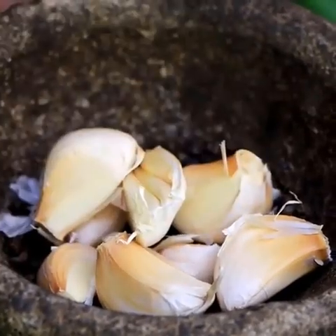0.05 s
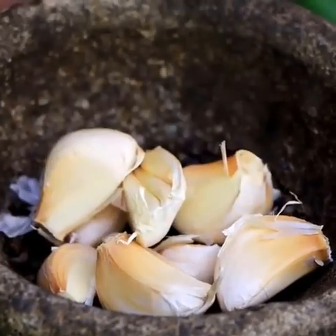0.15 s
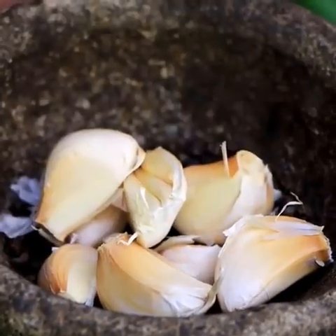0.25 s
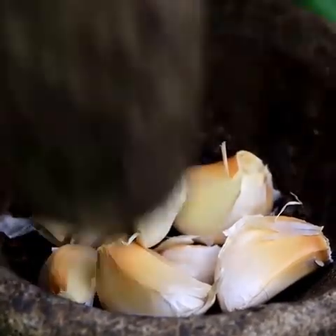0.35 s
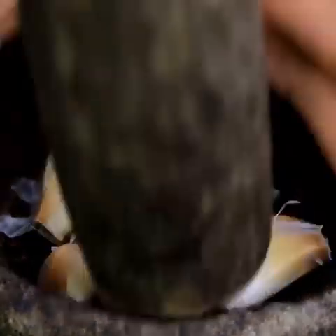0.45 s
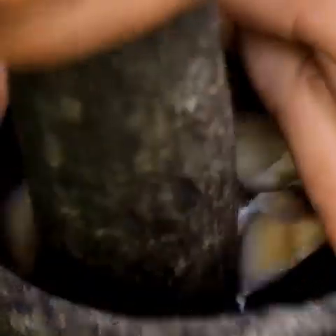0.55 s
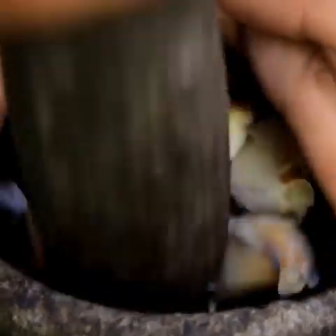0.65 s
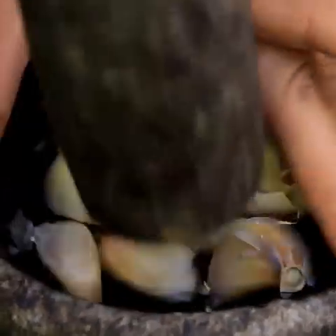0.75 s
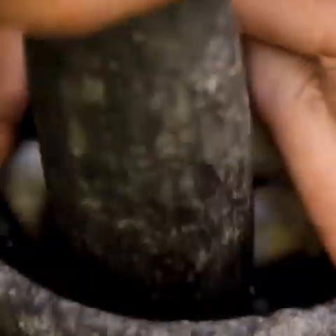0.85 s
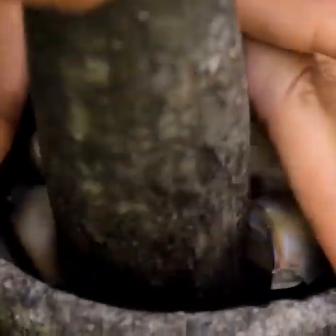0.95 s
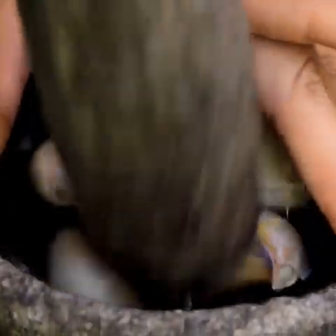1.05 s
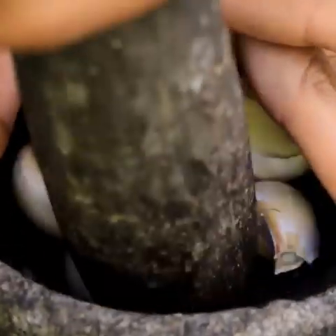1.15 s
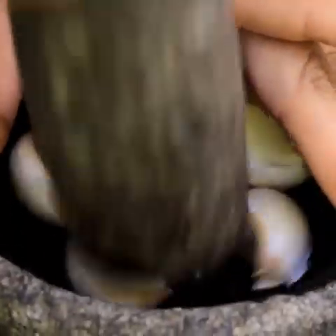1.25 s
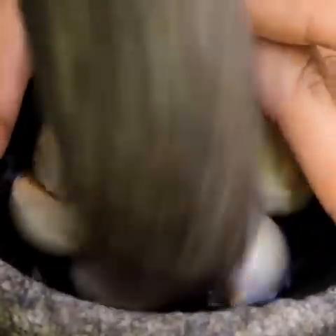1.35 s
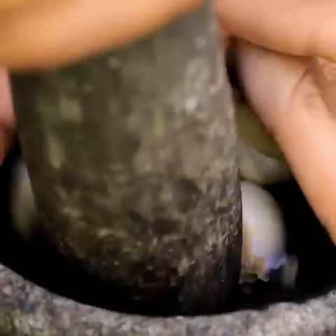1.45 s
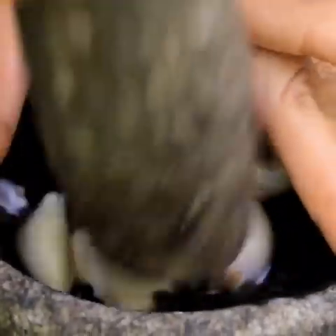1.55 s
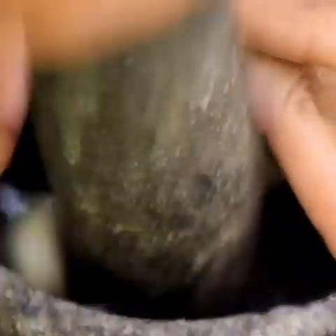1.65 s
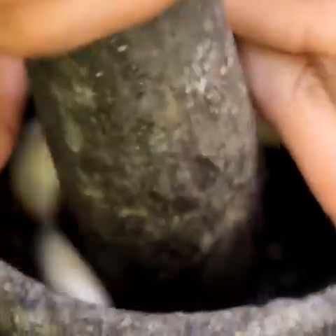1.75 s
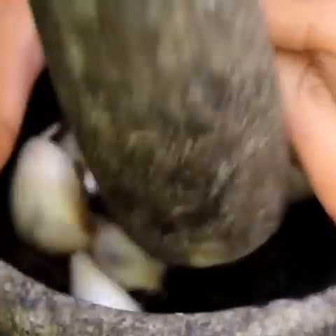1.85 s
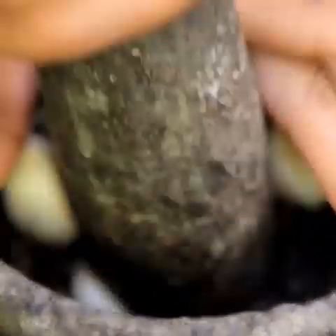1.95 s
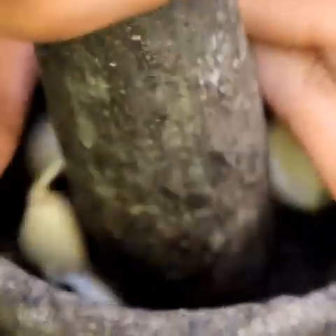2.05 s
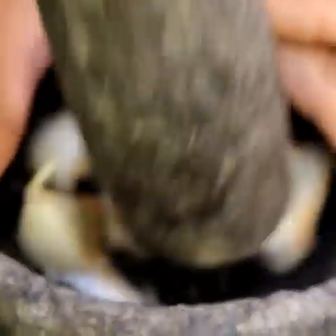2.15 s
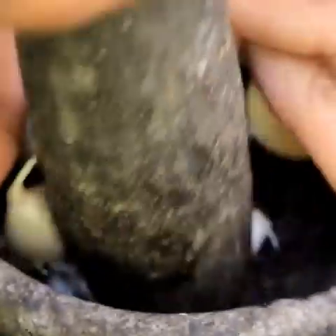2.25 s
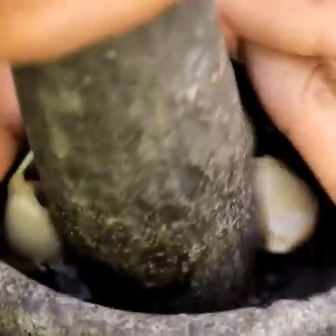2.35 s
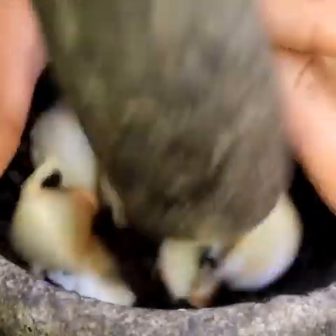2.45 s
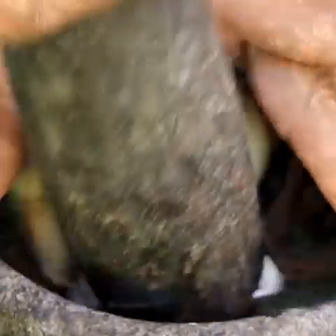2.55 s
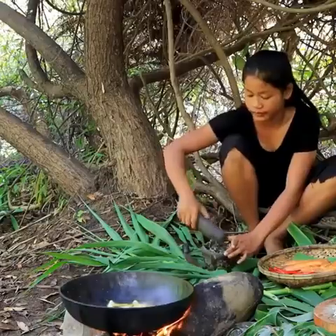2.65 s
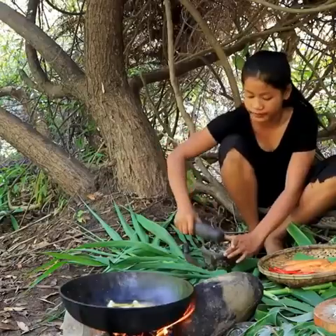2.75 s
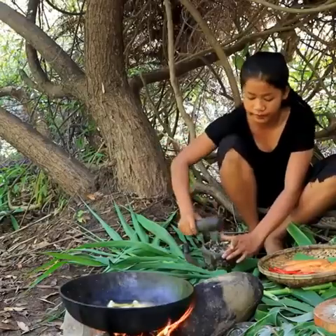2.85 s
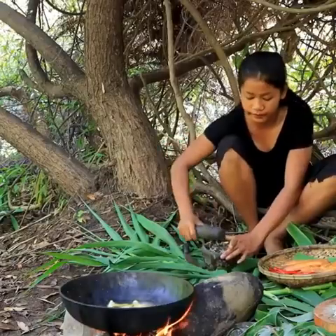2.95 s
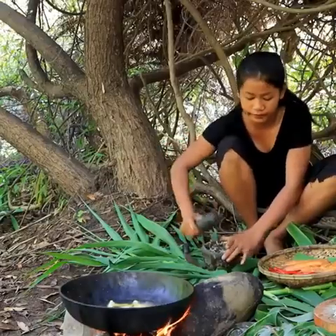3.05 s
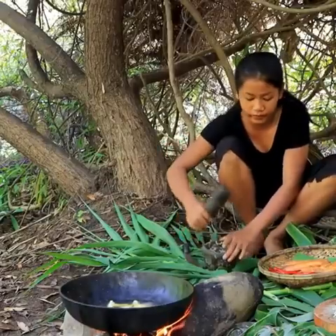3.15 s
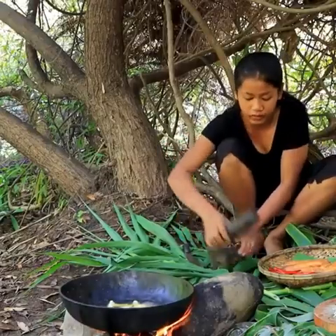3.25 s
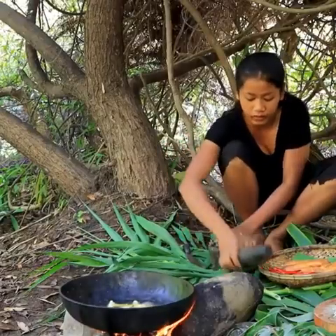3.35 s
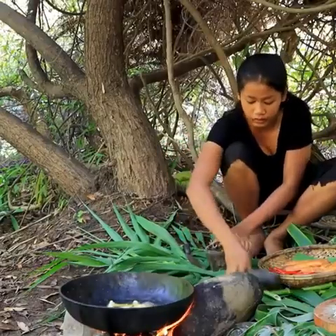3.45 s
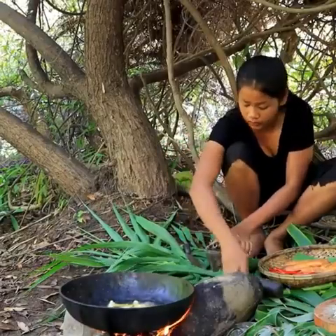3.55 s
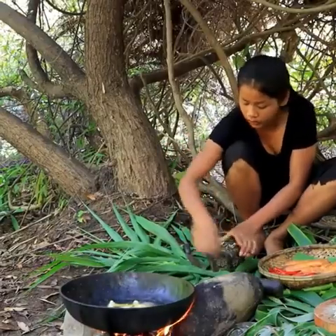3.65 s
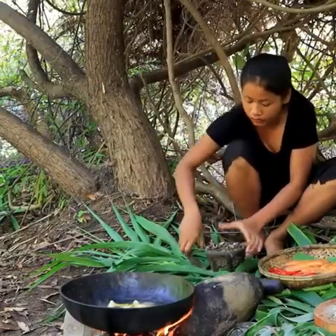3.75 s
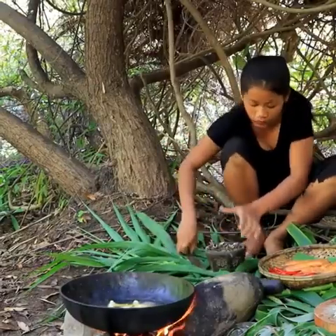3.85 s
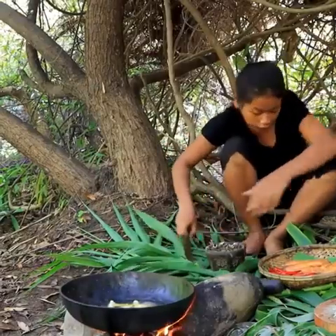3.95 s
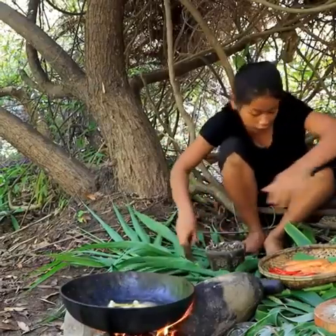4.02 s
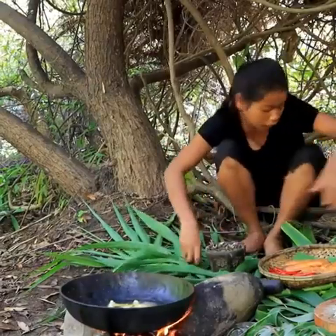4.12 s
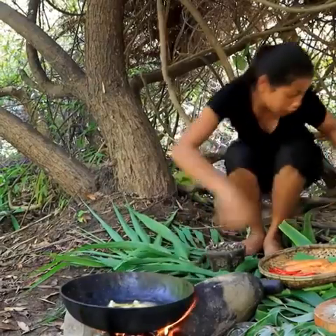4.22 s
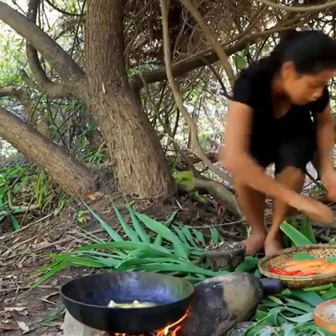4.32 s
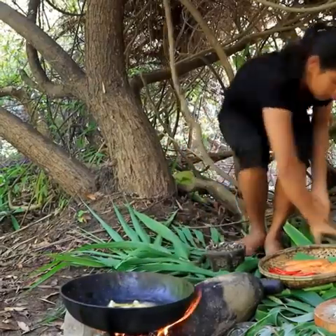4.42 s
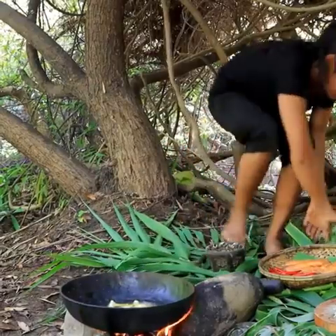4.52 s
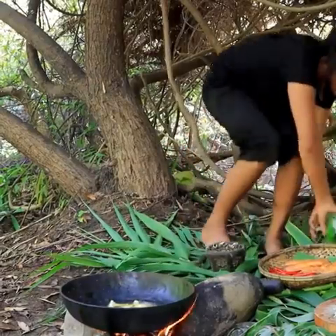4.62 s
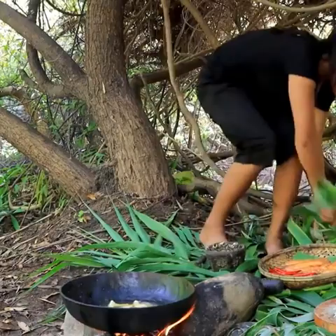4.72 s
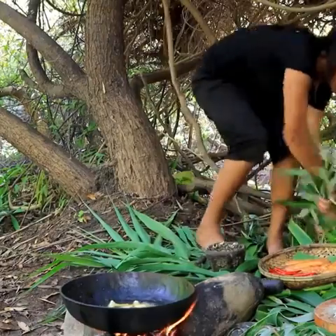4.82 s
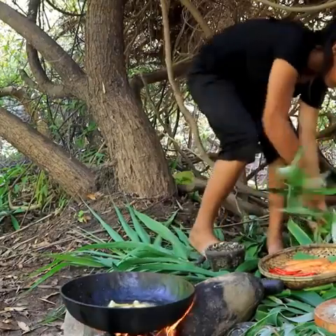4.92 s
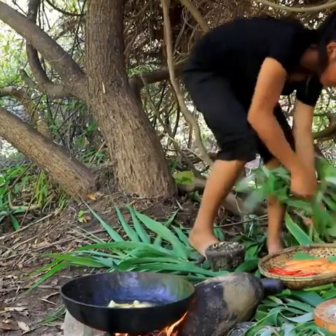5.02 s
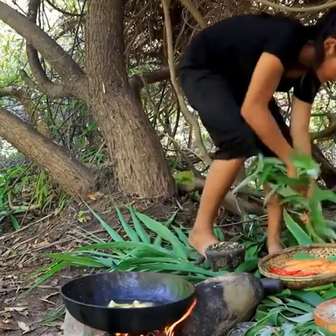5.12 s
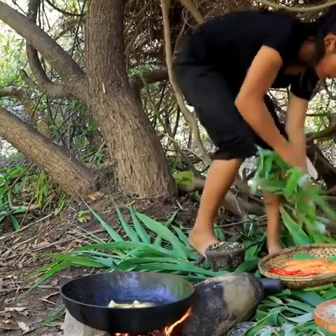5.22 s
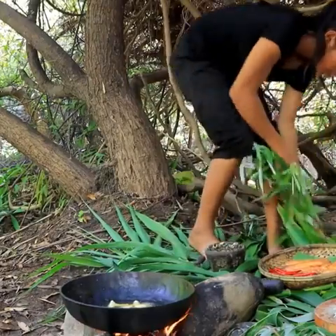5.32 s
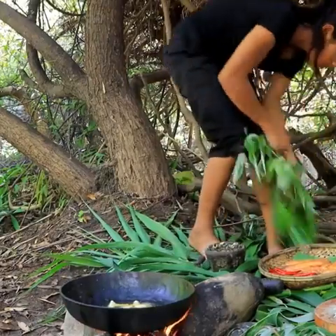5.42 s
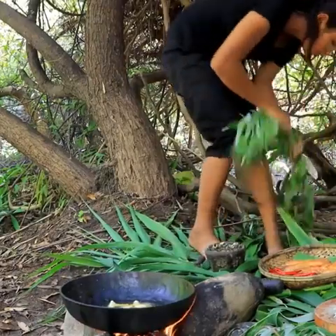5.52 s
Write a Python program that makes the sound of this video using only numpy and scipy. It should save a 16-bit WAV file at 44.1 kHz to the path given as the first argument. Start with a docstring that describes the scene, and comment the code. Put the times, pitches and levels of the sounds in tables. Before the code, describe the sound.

Outdoors, close and nearly dry, with a very short dull echo. The first half second is almost silent: faint, dull distant water, a tiny husk rustle at 0.15 s and a soft nudge at 0.2. At 0.53-0.7 s light hollow stone taps cluster with a small crunch; at 0.87 a hard bright knock bounces quickly and grinds to rest. Cushioned, gritty crunches follow at about 1.15, 1.45, 1.7, 2.0, 2.3 and 2.6 s, crumbs pattering between them over soft thuds and low rumble. At 2.6 s the water abruptly turns near, bright and louder, a steady fizzing, frying-like hiss with fine bubbles. Two strong ringing stone knocks land at 2.8 and 3.0 s. Afterwards the hiss continues to 5.6 s under random ticks, sharp snaps at 3.55, 4.07 and 5.1, rising gurgles mostly 3.4-4.0, and brief leaf rustles at 3.55 and from 4.6 onward.

```python
"""Stone pestle and mortar beside water

A stone pestle pounds garlic and peppercorns, close up and outdoors; at the end leaves are lifted.
Bare stone knocks from decaying modes and rings the pestle; spices crunch as click trains through the mortar.
Water is noise, spray, splashes and rising bubbles: at first dull, then abruptly bright and louder.
Thuds, snaps, filtered rustles, gurgles, a low rumble of handling and a short echo complete the place."""
import sys
import numpy as np
from scipy import signal
from scipy.fft import rfft, irfft
from scipy.io import wavfile

SR = 44100
rng = np.random.default_rng(int(sys.argv[2]) if len(sys.argv) > 2 else 0)


def output_pcm(signal):
    """Save a mono or channel-first signal as 16-bit PCM at the path in sys.argv[1].

    Samples are clipped to [-1, 1] before scaling.
    """
    pcm = np.clip(np.atleast_2d(signal).T, -1, 1) * 32767
    wavfile.write(sys.argv[1], SR, np.round(pcm).astype(np.int16))


N = 246078

# stone meets stone: t/s, knock level/dB, pitch of the hollow f/Hz, contact chatter f/Hz,
# chatter level/dB, pestle ring level/dB, time to the first rebound/s (0 = none)
BARE_BLOWS = [(0.532, -21, 1222, 1820, -29, -32, 0.0021), (0.5551, -33, 1390, 2980, -36.5, -30, 0.0004),
              (0.5673, -39.5, 1400, 2970, -35.5, -26.5, 0), (.6065, -26, 1384, 2440, -44, -42, 0.0045),
              (.691, -24, 1339, 2650, -48.5, -39.5, 0.00024), (0.8673, -8, 1348, 2750, -7.5, -16.5, 0.007),
              (2.568, -16, 1469, 2890, -21, -42, 0), (2.8235, -9, 1495, 3385, -22.5, -8.5, .0074),
              (2.9717, -7, 1479, 3435, -11.5, -10.5, 0.0058)]
# spices burst under the pestle: t/s, level/dB, rise/s, fall/s, hollow boost/dB, treble boost/dB,
# scattering crumbs level/dB, thud level/dB
SPICE_BLOWS = [(0.616, -29, 0.0285, 0.0115, -4.5, 25.5, -46, -65.5),
               (.873, -27, 0.0028, 0.0171, -3, 32, -42.5, -55.5),
               (1.1551, -20.5, 0.00716, 0.00884, -0.5, 7.5, -46, -42),
               (1.440, -17.5, 0.00634, 0.00447, 1.5, 15.5, -43.5, -36),
               (1.716, -19, 0.00764, 0.011, 5.5, 25, -40, -36),
               (2.002, -19.5, 0.00687, 0.00873, 5, 23, -43, -38),
               (2.29, -23.5, 0.0111, 0.0073, 1.5, 14.5, -42, -41.5),
               (2.576, -19, 0.0066, 0.00533, -0.5, 0.5, -54.5, -40.5)]
WATER_NEARS_S = 2.61
GURGLE_RISE_OCTAVES_PER_S = 6.16


def amp(db):
    """Decibels to gain."""
    return 10 ** (np.asarray(db) / 20)


def evened(x):
    """Scales to rms 1."""
    return x / np.sqrt(np.mean(x ** 2) + 1e-20)


def peaked(x):
    """Scales to peak 1."""
    return x / (abs(x).max() + 1e-12)


def seconds(length):
    """A time axis in seconds."""
    return np.arange(int(length * SR)) / SR


def curve(rows):
    """Joins rows (s, value) by straight lines over the whole scene."""
    return np.interp(np.arange(N) / SR, *np.transpose(rows))


def add(mix, s, sound):
    """Lays a sound into the mix at time s."""
    part = mix[max(round(s * SR), 0):][:len(sound)]
    part += sound[:len(part)]


def coloured(x, points):
    """Filters x by a curve of points (Hz, dB), then scales to rms 1."""
    f, db = np.transpose(points)
    log_f = np.log(np.fft.rfftfreq(len(x), 1 / SR) + 1)
    gain = amp(np.interp(log_f, np.log(f + 1), db))
    return evened(irfft(rfft(x) * gain, len(x)))


def drift(size, hz):
    """A random wander through hz new values a second, joined by straight lines."""
    knots = np.arange(size) * hz / SR
    return np.interp(knots, np.arange(size), rng.standard_normal(size))


def grains(size, per_s, spread_db):
    """A random train of small and large clicks of either sign, at rms 1."""
    sizes = amp(spread_db * np.minimum(rng.exponential(1, size), 4)) * rng.choice([-1, 1], size)
    return evened(sizes * (rng.random(size) < per_s / SR))


def swell(t, peak_s):
    """Rises to 1 at t = peak_s and dies away."""
    return t / peak_s * np.exp(1 - t / peak_s)


def chance_times(start, per_s):
    """Random moments from start to the end, each with two values between -1 and 1."""
    draws = rng.random((64, 3))
    times = start + np.cumsum(.3 + 1.4 * draws[:, 0]) / per_s
    return np.column_stack([times, 2 * draws[:, 1:] - 1])[times < N / SR]


def bubble(hz, octaves_per_s, length):
    """A bubble rings and rises in pitch as it nears the surface; it is loudest near half its length."""
    t = seconds(.12)
    turns = np.cumsum(hz * 2 ** (octaves_per_s * t)) / SR
    return swell(t, length / 2) * np.sin(2 * np.pi * turns)


def babble(count=48, per_s=14, cycles=6):
    """Crowds of bubbles of many sizes; the smaller and higher they are, the more of them."""
    out = np.zeros(N)
    for hz in np.geomspace(430, 3200, count):
        shape = bubble(hz, rng.uniform(1, 11.73), cycles / hz * rng.uniform(0.563, 1.0))
        shape = shape / np.linalg.norm(shape)
        births = grains(N, per_s * hz / 1000, spread_db=2.0)
        out += signal.oaconvolve(births, shape)[:N] * np.sqrt(hz)
    return evened(out)


def splashes(count=7, decay_s=0.0162):
    """Small splashes: short puffs of hiss, each in a band of its own."""
    out, puff = np.zeros(N), swell(seconds(.1), decay_s / 2)
    for hz in np.geomspace(550, 2000, count):
        size = abs(signal.oaconvolve(abs(grains(N, per_s=16, spread_db=1.8)), puff)[:N])
        band = signal.butter(2, [hz / 1.2, hz * 1.2], "band", fs=SR)
        out += size * signal.lfilter(*band, rng.standard_normal(N))
    return evened(out)


def water(bubbles_db=-6, spray_db=-5, splashes_db=-9, far_db=-45, near_db=-0.3274):
    """Wash, spray, splashes and bubbles, first distant and dull, then near and bright."""
    # tone of the distant and of the near water: f/Hz, relative level/dB
    far_tone = [(190, -39.5), (330, -21), (685, -8), (860, -7), (1420, -7), (1620, -5), (1760, -9),
                (2390, -15.5), (2640, -13.5), (3480, -11.5), (4360, -10), (5480, -4.5), (7220, -8),
                (12700, -24), (16000, -25.5)]
    near_tone = [(120, -68.5), (200, -44.5), (263, -12.5), (305, -17), (440, -3.5), (538, -1), (916, 0),
                 (1420, 1.5), (3430, -5), (4680, 2), (6050, 1.5), (7270, 4.5), (10900, -14), (14300, -15.5),
                 (16000, -22.5)]
    # course of the near water: t/s, level relative to near_db/dB
    near_flow = [(2.66, -41), (3.46, -39), (4.43, -39), (5.58, -39)]
    spray = grains(N, per_s=4000, spread_db=3.2) * amp(2.5 * drift(N, hz=160))
    wash = rng.standard_normal(N) * amp(1.4 * drift(N, hz=60))
    wash = coloured(wash, [(100, 3.5), (400, 3.5), (600, 0.0), (2200, -1), (3500, 4.0), (7000, -9), (10000, 0)])
    stir = wash + amp(spray_db) * spray + amp(bubbles_db) * babble() + amp(splashes_db) * splashes()
    near = np.clip((np.arange(N) / SR - WATER_NEARS_S) / 0.016 + .5, 0, 1)  # a 16 ms crossfade
    far_water = amp(far_db) * coloured(stir, far_tone)
    near_water = amp(near_db + curve(near_flow)) * coloured(stir, near_tone)
    return (1 - near) * far_water + near * near_water


def low_rumble(murmur_db=-67):
    """Low rumble of handling, strongest during the pounding, over a steady low murmur."""
    # tone of the rumble and of the murmur: f/Hz, relative level/dB
    rumble_tone = [(20, -2), (40, 9.5), (60, -0.5), (85, -12), (130, -16), (250, -12.5), (500, -33.5),
                   (2000, -70)]
    murmur_tone = [(20, -14.5), (50, -6.5), (78, -2.5), (110, -8.5), (250, -5.5), (500, -8), (2000, -54.5)]
    # course of the rumble: t/s, level/dB
    rumble_course = [(0, -85.5), (1.05, -63.5), (1.9, -64), (2.4, -69), (3.0, -87.5), (5.58, -102)]
    rumble = amp(curve(rumble_course)) * coloured(rng.standard_normal(N), rumble_tone)
    return rumble + amp(murmur_db) * coloured(rng.standard_normal(N), murmur_tone)


def leaves(band_octaves=0.65):
    """Leaves and husks brush each other in clumps of tiny slips that swell and fade."""
    # husks and leaves brushed or lifted: t/s at the height, level/dB, spread of the swell/s, centre f/Hz
    rustles = [(0.151, -43.5, 0.009, 1290), (3.551, -34.5, 0.0074, 5000), (4.599, -46, 0.03, 1700),
               (4.939, -40, 0.0122, 2000), (5.001, -45, 0.028, 2300), (5.231, -36.5, 0.013, 2000),
               (5.35, -45, 0.024, 2000), (5.556, -49, 0.047, 3000)]
    out, t = np.zeros(N), np.arange(N) / SR
    slips = grains(N, per_s=2500, spread_db=3) * amp(3 * drift(N, hz=70))
    for s, db, spread_s, hz in rustles:
        edges = [hz / 2 ** band_octaves, min(hz * 2 ** band_octaves, SR * .45)]
        band = signal.butter(1, edges, "band", fs=SR)
        envelope = np.exp(-.5 * ((t - s) / spread_s) ** 2)
        out += amp(db) * envelope * evened(signal.lfilter(*band, slips))
    return out


def mortar(hollow_hz, hollow_db=0, treble_db=0):
    """The mortar's answer to one click; the pestle shades the opening and shifts the hollow's pitch."""
    # modes, hollow first (each blow sets its pitch): f/Hz, width/Hz, level before weighting by width/dB
    modes = [(1400, 139.7, 9.5), (2818, 57, 0), (3514, 240, 5.5), (5016, 790, 7), (6741, 865, 7.5),
             (7286, 182, 4.5), (8803, 413, 2), (12740, 1600, -26.5)]
    t = seconds(.08)
    hz, width, db = np.array(modes, float).T
    hz[0] = hollow_hz
    db[0] += hollow_db
    db[-1] += treble_db
    ringing = np.exp(-np.pi * np.outer(width, t)) * np.cos(2 * np.pi * np.outer(hz, t))
    return (amp(db) * width) @ ringing


def knock(hollow_hz, hollow_db=10, contact_hz=3500):
    """The hollow knock of the mortar, dulled by the length of the contact, at peak 1."""
    contact = signal.butter(2, min(contact_hz, SR / 3), fs=SR)
    return peaked(signal.lfilter(*contact, mortar(hollow_hz, hollow_db)))


def thud(hz, decay):
    """A few low cycles that sink from 1.37 to 0.64 of hz as the mortar settles, at peak 1."""
    t = seconds(.25)
    turns = np.cumsum(hz * (0.637 + 0.73 * np.exp(-t / decay))) / SR
    return peaked(np.exp(-t / decay) * (1 - np.exp(-t / 0.00055)) * np.sin(2 * np.pi * turns))


def thuds(through_db=-10, through_hz=1420, thud_growth=3.2, soft_hz=105.7, soft_s=0.00645, soft_lag_s=0.00167):
    """The ground takes every blow and nudge; a cushioned blow pushes later and knocks faintly through."""
    # jolt and sinking of the mortar under a full-strength bare blow: nominal f/Hz, decay/s, level/dB
    hard_thud = [(329, 0.00172, -16), (129.8, 0.0101, -21.5)]
    # further low thuds, one under the blow at 0.53 s, the others nudges of the mortar:
    # t/s, level/dB, nominal f/Hz, decay/s
    further_thuds = [(.219, -37, 226, 0.00225), (.5325, -35.5, 391, 0.0035), (1.024, -47.5, 64.6, 0.0133),
                     (1.068, -46, 57.3, 0.0296)]
    out = np.zeros(N)
    for s, db, *_ in BARE_BLOWS:
        for hz, decay, thud_db in hard_thud:
            add(out, s, amp(thud_db + thud_growth * db) * thud(hz, decay))
    for s, db, *_, thud_db in SPICE_BLOWS:
        add(out, s, amp(db + through_db) * knock(through_hz))
        add(out, s + soft_lag_s, amp(thud_db) * thud(soft_hz, soft_s))
    for s, db, hz, decay in further_thuds:
        add(out, s, amp(db) * thud(hz, decay))
    return out


def pestle_ring(t, rise_s=0.00201):
    """The pestle's high modes ring on after a soft onset, at peak 1."""
    # modes: f/Hz, relative level/dB, time to fall 60 dB/s
    modes = [(6858.5, 10, 0.0287), (7033, -14.5, 0.049), (15400, -28, .014)]
    ring = sum(amp(db - 60 * t / t60) * np.sin(2 * np.pi * hz * t) for hz, db, t60 in modes)
    return peaked(ring * (1 - np.exp(-(t / rise_s) ** 2)))


def rebounds(t, db, hollow_hz, chatter, flight, count=3, share=0.69, fade_db_per_s=709):
    """The pestle bounces: each flight is a share of the last, knocks fade and the hollow sounds sharper."""
    out = np.zeros(len(t))
    rebound = knock(hollow_hz * 1.0926, contact_hz=2300) + amp(-19.5) * chatter
    for late in np.cumsum(flight * share ** np.arange(count)):
        add(out, late, amp(db - fade_db_per_s * late) * rebound)
    return out


def grind(t, db, hollow_hz, grind_db=-18.5, grind_s=0.0164):
    """The pestle grinds to rest: a fading train of slips sounds the mortar."""
    slips = grains(len(t), per_s=4600, spread_db=6.5)
    slips = signal.fftconvolve(slips, knock(hollow_hz, hollow_db=4, contact_hz=4720))[:len(t)]
    return amp(db + grind_db) * np.exp(-t / grind_s) * evened(slips)


def knocks(chatter_s=0.000674, grit_s=0.00224, grit_db=0, grit_growth=1.852):
    """Bare stone: hollow knock, contact chatter, crack of grit and pestle ring; some rebound and grind."""
    # tone of the grit: f/Hz, relative level/dB
    grit_tone = [(100, -11), (600, -7), (1200, -13.5), (2100, 12), (2700, -4.5), (4200, 7), (5800, -15),
                 (8000, -20), (9200, 1.5), (12000, -4.5), (16000, -8)]
    out, t = np.zeros(N), seconds(.08)
    ring = pestle_ring(t)
    for s, db, hollow_hz, chatter_hz, chatter_db, ring_db, flight in BARE_BLOWS:
        chatter = swell(t, chatter_s) * np.sin(2 * np.pi * chatter_hz * t)
        grit = np.exp(-t / grit_s) * coloured(rng.standard_normal(len(t)), grit_tone)
        add(out, s, amp(db) * knock(hollow_hz))
        add(out, s, amp(chatter_db) * chatter + amp(ring_db) * ring)
        add(out, s, amp(grit_db + grit_growth * db) * grit)  # falls off steeply for lighter blows
        if flight > 0:
            # room for the last rebound to ring out
            add(out, s, rebounds(seconds(.16), db, hollow_hz, chatter, flight))
            add(out, s, grind(t, db, hollow_hz))
    return out


def crunches(hollow_hz=1400, scatter_s=0.1473, lumps_db=0.5, clumps_db=1.55, low_edge_hz=950):
    """Tiny fractures sound the mortar in lumps; crumbs then patter round its wall."""
    out, t = np.zeros(N), seconds(.3) - .1  # starts 0.1 s ahead of the height
    for s, db, rise, fall, hollow_db, treble_db, crumbs_db, _ in SPICE_BLOWS:
        touching = np.clip(t / rise + 2.56, 0, 1)  # the pestle meets the first husk
        pressure = touching * np.exp(-.5 * (t / np.where(t < 0, rise, fall)) ** 2)
        lumps = amp(db + lumps_db * drift(len(t), hz=450))
        fractures = lumps * pressure * grains(len(t), per_s=5500, spread_db=3.4)
        settling = (t > 0) * np.exp(-(np.maximum(t, 0) / scatter_s) ** 3)
        clumps = amp(crumbs_db + clumps_db * drift(len(t), hz=120))
        crumbs = clumps * settling * grains(len(t), per_s=7000, spread_db=4)
        crush_body = mortar(hollow_hz, hollow_db, treble_db)
        wall_body = mortar(hollow_hz, hollow_db=-12.5, treble_db=15)
        for clicks, body in (fractures, crush_body), (crumbs, wall_body):
            add(out, s + t[0], signal.fftconvolve(clicks, body / np.linalg.norm(body)))
    return signal.lfilter(*signal.butter(2, low_edge_hz, "high", fs=SR), out)  # small bits radiate no bass


def crackles(ticks_per_s=11, tick_db=-31, tick_spread_db=4, tick_hz=3580, tick_octaves=0.646, tick_s=0.00156):
    """Each crackle is a short clump of tiny breaks; random ticks join in after the last crunch."""
    # snaps of husks and twigs, and a gritty knock at 2.55 s: t/s, peak level/dB, centre f/Hz, decay/s
    snaps_and_knock = [(1.044, -27, 6400, 0.0031), (1.5563, -35.5, 6550, 0.0027),
                       (2.41, -27.5, 3120, 0.0031), (2.551, -21.5, 3470, 0.0026),
                       (3.2105, -26.5, 4500, 0.00176), (3.555, -18, 5470, 0.0021),
                       (4.0672, -20.5, 2100, 0.0038), (4.961, -24.5, 5030, 0.0049),
                       (5.013, -22.5, 3080, 0.00314), (5.1059, -17, 6780, 0.00222),
                       (5.3344, -21, 3410, 0.00414), (5.5417, -23, 5300, 0.0023)]
    out, t = np.zeros(N), seconds(.08)
    ticks = [(s, tick_db + tick_spread_db * size, tick_hz * 2 ** (tick_octaves * pitch), tick_s)
             for s, size, pitch in chance_times(SPICE_BLOWS[-1][0], ticks_per_s)]
    for s, db, hz, decay in snaps_and_knock + ticks:
        edges = np.minimum([hz * 0.72, hz * 1.3], [SR * .4, SR * .45])
        band = signal.butter(1, edges, "band", fs=SR)
        breaks = signal.lfilter(*band, grains(len(t), per_s=15000, spread_db=0.5))
        add(out, s, amp(db) * peaked(breaks * np.exp(-t / decay)))
    return out


def gurgles(count=5, followers=0.567, random_per_s=3, random_db=-44, random_spread_db=1.5,
            random_hz=527.7, random_octaves=0.488, random_s=.012):
    """One bubble breaks up and higher ones follow; random gurgles join in once the water is near."""
    # gurgles at given times: t/s, level/dB, starting f/Hz, length/s
    timed = [(2.175, -44, 713, 0.0128), (3.405, -31, 615, 0.0077), (3.5, -42, 419.6, 0.01627),
             (3.526, -35.5, 724.5, 0.0145), (3.712, -33.5, 957, .0095), (3.809, -41.5, 414, 0.021),
             (3.84, -45, 639, .02), (3.965, -33.5, 1360, 0.0048), (5.018, -37, 1092, 0.0097),
             (5.338, -36.5, 663.7, 0.0134)]
    out = np.zeros(N)
    by_chance = [(s, random_db + random_spread_db * size, random_hz * 2 ** (random_octaves * pitch), random_s)
                 for s, size, pitch in chance_times(WATER_NEARS_S, random_per_s)]
    for s, db, hz, length in timed + by_chance:
        add(out, s, amp(db) * bubble(hz, GURGLE_RISE_OCTAVES_PER_S, length))
        for late, higher, size in rng.random((count, 3)):
            follower = bubble(hz * 1.702 ** higher, GURGLE_RISE_OCTAVES_PER_S, length / 2)
            add(out, s + 2 * length * late, amp(db) * followers * (.5 + size) * follower)
    return out


def surroundings(x, t60=0.113, wet_db=-17):
    """Ground and trunks throw back a short, dull scatter of echoes."""
    t = seconds(.3)
    tone = [(100, 1.0), (1500, -9.5), (4000, 0), (7000, -9.5), (16000, -0.5)]
    tail = coloured(grains(len(t), per_s=1300, spread_db=4), tone)
    tail = tail * amp(-60 * t / t60) * (t > .005)
    return amp(wet_db) * signal.oaconvolve(x, tail / np.linalg.norm(tail))[:N]


def scene():
    """The mortar in front with its echo, water and a low rumble behind."""
    background = water() + low_rumble()
    close = leaves() + thuds() + knocks() + crunches() + crackles()
    return (background + close + surroundings(close) + gurgles())[None]


def record(dry, edge_hz=15900):
    """The hardest peaks are rounded off below 0.5; then a steep low-pass removes the top."""
    rounded = dry / (1 + (dry / .5) ** 4) ** (1 / 4)
    low_pass = signal.firwin(511, edge_hz, window=("kaiser", 9), fs=SR)
    return signal.oaconvolve(rounded, low_pass[None], "same")


dry = scene()
out = record(dry)
output_pcm(out)
```